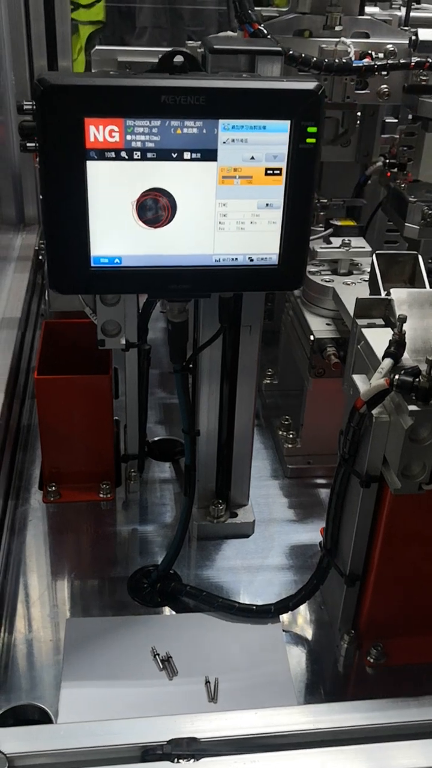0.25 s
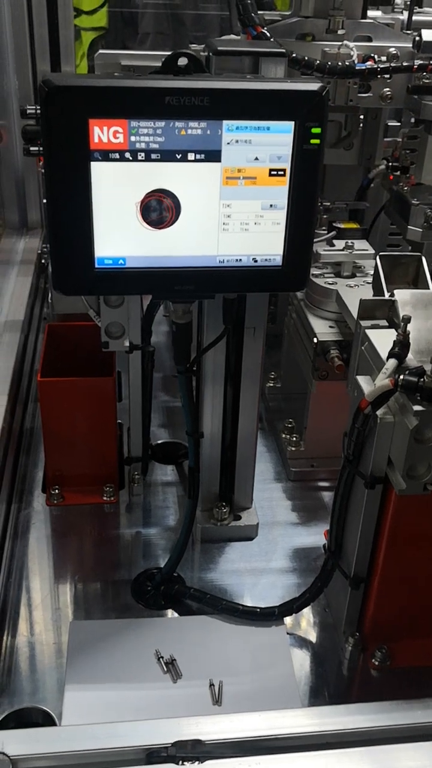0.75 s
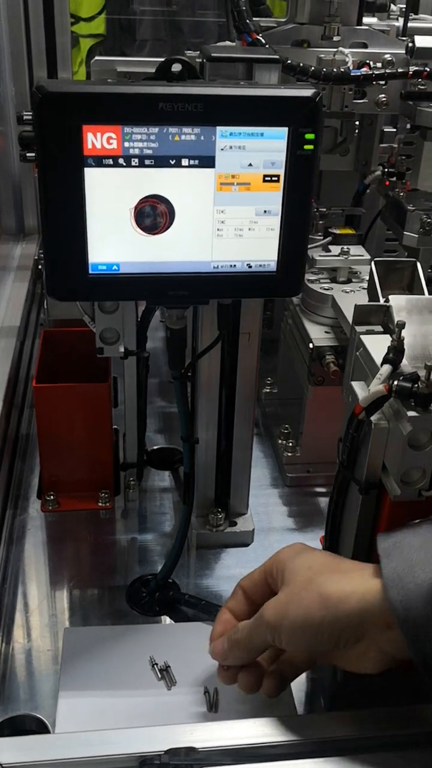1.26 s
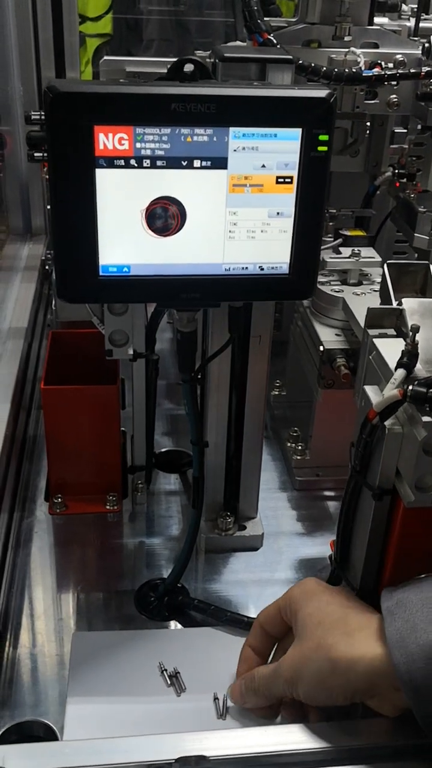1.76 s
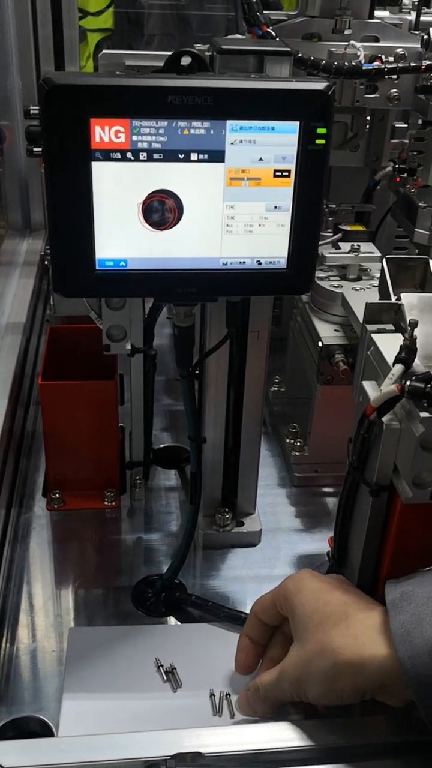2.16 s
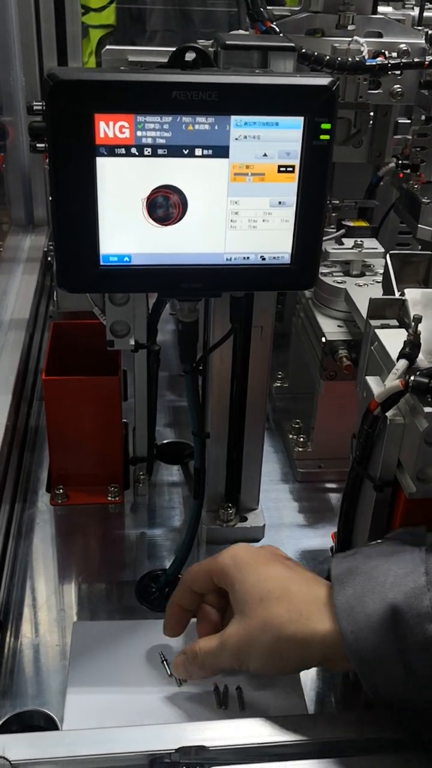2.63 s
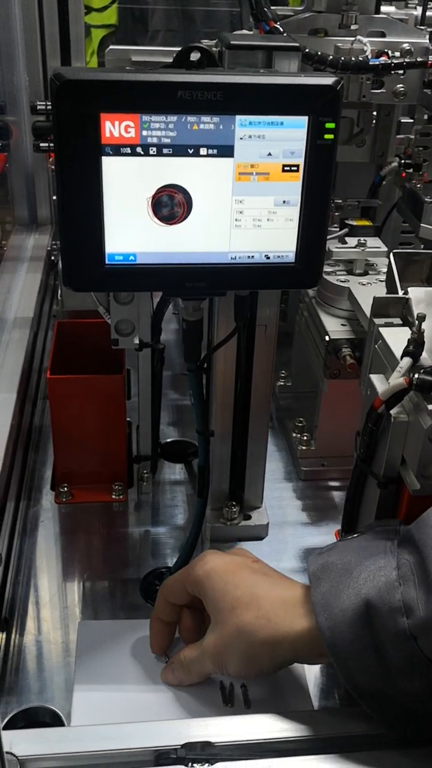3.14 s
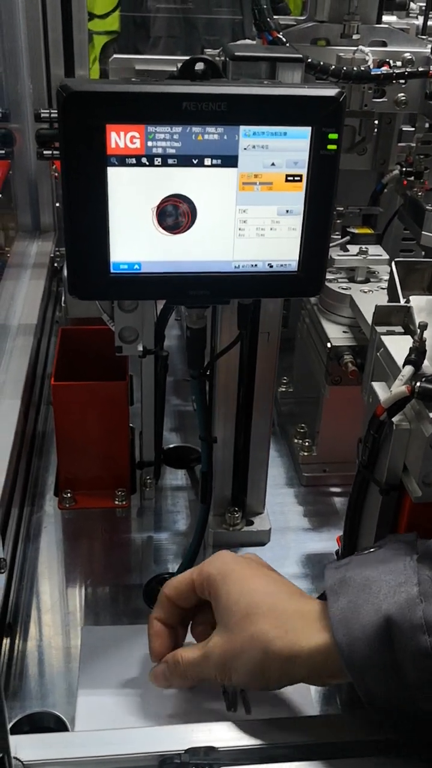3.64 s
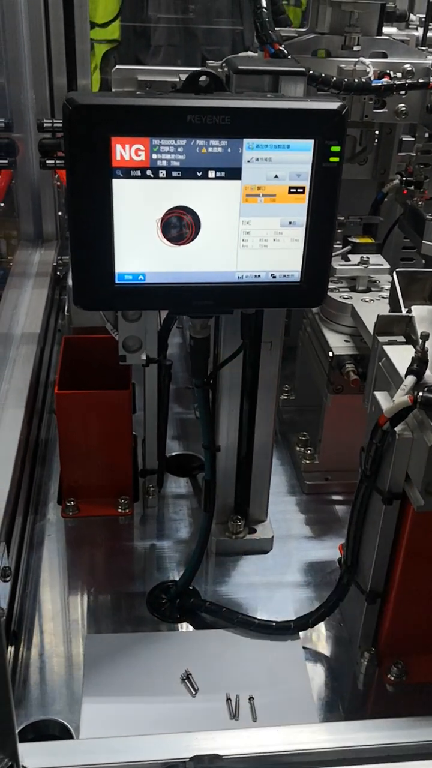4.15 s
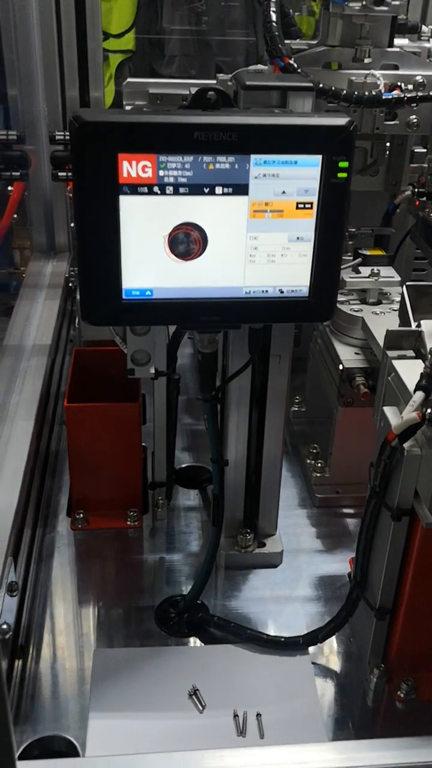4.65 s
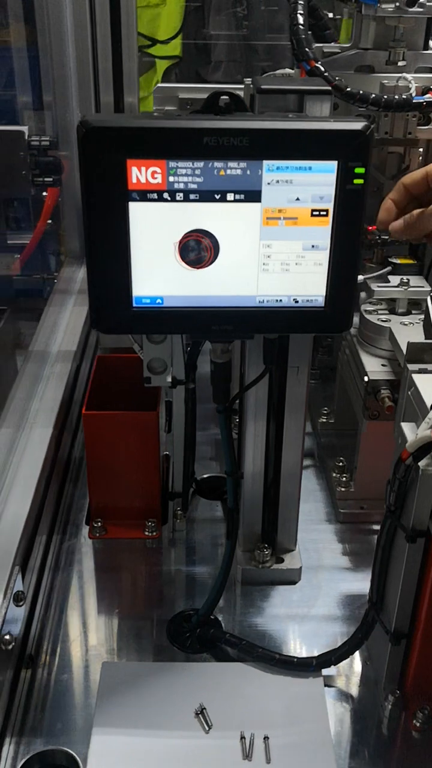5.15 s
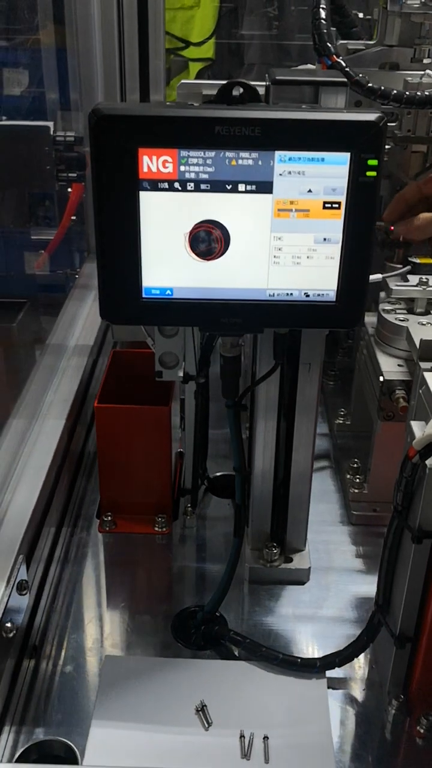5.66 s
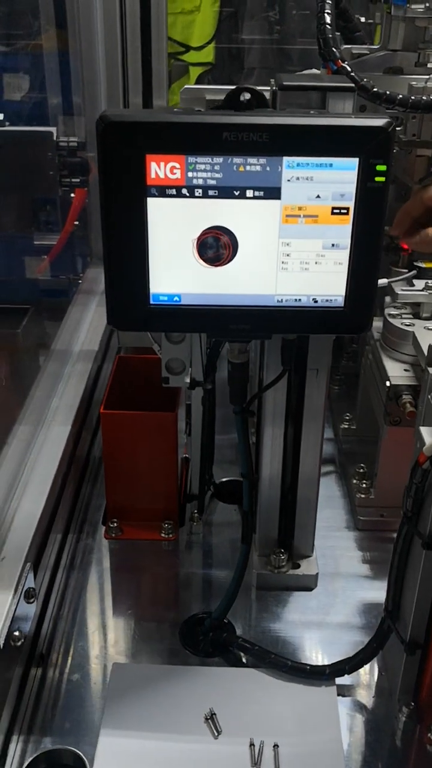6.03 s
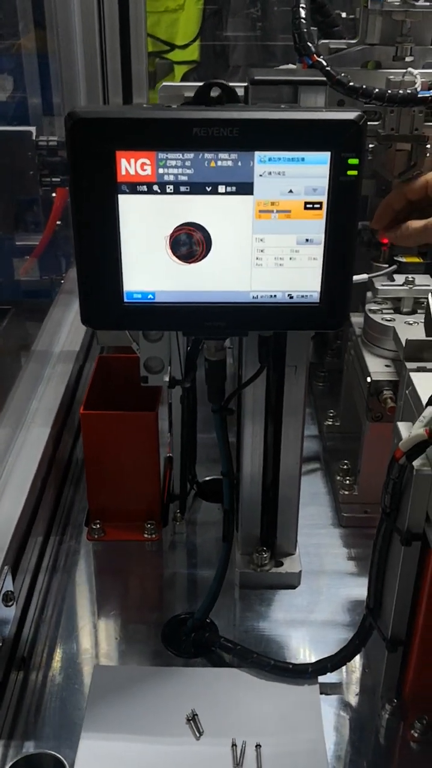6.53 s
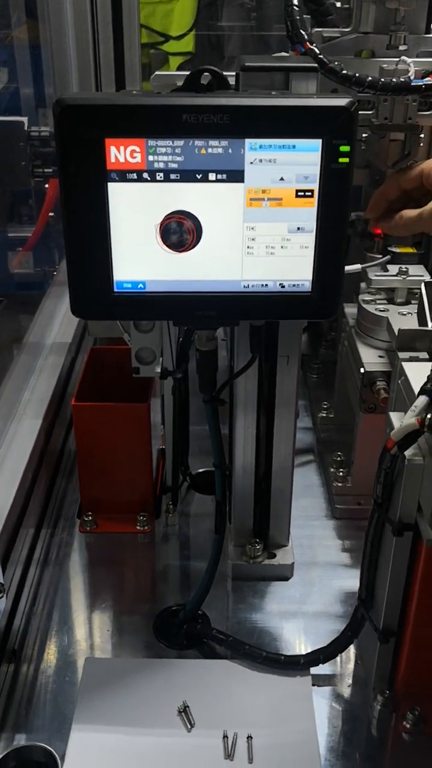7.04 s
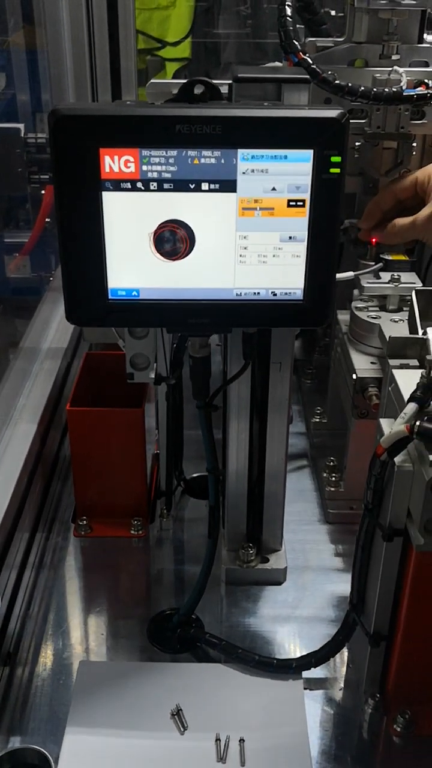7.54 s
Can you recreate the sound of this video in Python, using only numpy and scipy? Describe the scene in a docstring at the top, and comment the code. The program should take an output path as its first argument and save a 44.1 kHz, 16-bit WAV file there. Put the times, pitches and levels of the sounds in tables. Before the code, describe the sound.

Bursts of whistling compressed air, valve puffs and metal clanks sound over the steady hum of factory machinery.

```python
"""Humming motors and the steady hiss of a leaking air line: an assembly machine in a hard-walled hall.
Valves puff, pneumatic cylinders clunk against their stops and a servo whines faintly upward.
Then an air jet takes over, blowing in bursts across metal parts while a carriage rumbles on its rail.
Late on, the steel frame clanks and rings. The left microphone port resonates in the treble and makes
all the hiss whistle; the recorder's gain control ducks the hum under each burst."""
import sys
import numpy as np
from scipy import signal
from scipy.fft import rfft, irfft, next_fast_len
from scipy.io import wavfile
from scipy.ndimage import uniform_filter1d, map_coordinates

SR = 44100
rng = np.random.default_rng(int(sys.argv[2]) if len(sys.argv) > 2 else 0)


def to_wav(sig):
    """Store sig (one row per channel, or 1-D mono) as 16-bit WAV at the path in sys.argv[1].

    Samples outside -1..1 are clipped; the rate is SR.
    """
    pcm = np.clip(np.atleast_2d(sig), -1, 1) * 32767
    pcm = np.round(pcm).astype(np.int16)
    wavfile.write(sys.argv[1], SR, pcm.T)  # frames by channels


N = 343521

# bursts of the air jet: open_s, close_s, rise_s, hiss_db, fizz_db, splash_db, roar_db, bin_db
JET_BURSTS = [(2.285, 2.436, 0.088, -31, -37, -32, -42, -42),
              (2.363, 2.74, 0.43, -23.3, -29, -27.5, -44, -58),
              (2.647, 2.88, 0.19, -20.5, -25.5, -24, -32, -43),
              (3.27, 3.56, 0.28, -18.5, -21.5, -24, -29.5, -34.5),
              (3.58, 3.796, 0.11, -20.5, -25.5, -22.5, -26.5, -33),
              (3.924, 4.232, 0.27, -20, -22.5, -23.5, -29.5, -34.5),
              (4.303, 4.935, 0.26, -19.5, -23.5, -16.5, -28.5, -62),
              (5.281, 5.707, 0.18, -19.5, -24.5, -19.5, -25.5, -43),
              (5.881, 6.085, 0.15, -20, -23, -21, -24, -33.5),
              (6.125, 6.66, 0.096, -20.5, -26.5, -22, -28, -34),
              (6.655, 6.993, .04, -21, -27.5, -18, -24.5, -34),
              (6.97, 7.715, 0.11, -19.5, -26, -18.5, -26.5, -39.5)]
# noise colours of the jet's layers: frequency_hz, density_db
HISS_COLOUR = [(1000, -28), (3000, -14.5), (5000, -3), (6300, -0.5), (7400, 1), (8400, -3), (9400, 1.5),
               (11000, -12.5), (15000, -33)]  # at the nozzle
FIZZ_COLOUR = [(2500, -19), (5000, -22), (8000, 4), (9400, 4), (11000, 3), (13000, -0.5), (15000, -6)]  # at sharp edges
SPLASH_COLOUR = [(1000, -21.5), (1400, -11), (1650, -4), (2100, 0), (2700, 0), (3100, -3), (4600, -5),
                 (7000, -7), (12000, -48)]  # on the parts
ROAR_COLOUR = [(400, -10), (600, -10), (760, -4), (860, 2), (1000, -0.5), (1170, 1), (1400, -2.5),
               (1700, 6), (2500, -16.5)]  # in the hollows
BIN_COLOUR = [(380, -15), (490, -2), (545, -6.5), (605, 2.5), (670, -1), (730, -5), (900, -35.5)]  # the hum of an open bin
# how each layer follows the jet's valve: lag_s, fall_db_per_s, trickle_db
HISS_FLOW = (0.0034, 100, -40)
FIZZ_FLOW = (0.0085, 135, -48.5)
SPLASH_FLOW = (0.022, 73, -41.5)
ROAR_FLOW = (0.02, 102, -61)
BIN_FLOW = (0.026, 117, -65)
# the jet whistles on an edge: time_s, pitch_hz, level_db
EDGE_WHISTLE = [(4.48, 2420, -58), (4.56, 2480, -40), (4.68, 2500, -47), (4.76, 2680, -37),
                (4.84, 2790, -35), (4.9, 2830, -56)]

# puffs of trapped air: start_s, level_db, t60_s
EXHAUST_PUFFS = [(.42, -39, 0.82), (.865, -36, .25), (2.17, -40.5, 0.43), (6.687, -16, 0.65),
                 (6.79, -12.5, 0.52), (7.09, -28, 0.22), (7.26, -22, 0.3), (7.42, -16, 0.27)]  # valves vent
NOZZLE_SPITS = [(2.315, -38, 0.44), (3.35, -19.5, 0.45), (5.35, -16, 0.49), (5.932, -27, 0.46),
                (6.17, -27, 0.55)]  # the jet's valve snaps open
# their noise colours: frequency_hz, density_db
EXHAUST_COLOUR = [(400, -19), (1500, -2), (2800, 3.5), (5500, -1), (8000, -10), (14000, -19)]
SPIT_COLOUR = [(2000, -32), (5000, -15), (6400, -7), (7400, 1), (8500, -9), (11000, -20), (15000, -34)]

# metal hits: start_s, level_db, brightness_hz
FRAME_BLOWS = [(6.288, -15.5, 2000), (6.305, -13, 4000), (6.318, -18, 4000), (6.38, -18, 3500),
               (6.52, -12.5, 1390), (6.532, -15, 1440)]
CYLINDER_STOPS = [(.893, -24, 4500), (.935, -24, 3800), (1.07, -22, 4800), (1.081, -21.5, 6500),
                  (1.106, -22, 8980), (1.122, -22.5, 13000), (1.28, -45, 3500)]
# contact noise of the frame's clank and the cylinders' clunk: frequency_hz, density_db
CLANK_COLOUR = [(400, -26), (800, -4.5), (1300, -2.5), (2100, 0.5), (2750, 0), (3200, -6), (6000, -25)]
CLUNK_COLOUR = [(120, -27), (200, -9), (360, -11.5), (540, 0.5), (700, -2), (900, -2.5), (1200, -3),
                (1900, -5.5), (2350, 1.5), (3100, -3.5), (4000, -8.5), (6000, -16.5), (9000, -26.5),
                (14000, -38)]
# resonances of the steel frame and the cylinder mounts: pitch_hz, width_hz, gain_db
FRAME_MODES = [(837, 12, 11), (1277, 36, 6.6), (1484, 43, 5), (1920, 26, 7), (2047, 35, 7.4),
               (2210, 38, 4.4), (2700, 28, 6.7)]
MOUNT_MODES = [(518, 16, -1), (618, 42, 3), (869, 20, 5.5), (974, 40, 0), (1060, 25, 3.5), (1460, 26, 1),
               (1650, 30, 0), (1834, 55, 4), (2300, 100, -3), (2520, 34, -1)]

# the carriage travels on its rail: start_s, stop_s, level_db
CARRIAGE_MOVES = [(3.37, 3.598, -23), (3.61, 3.876, -27.5), (4.06, 4.3, -29.5), (4.526, 4.617, -32.5),
                  (6.008, 6.13, -30), (6.207, 7.698, -39)]
# rumble of its bearings: frequency_hz, density_db
BEARING_COLOUR = [(110, -21), (200, -3), (310, 0.5), (350, -4.5), (390, 3), (450, -18.5), (600, -18),
                  (1000, -25)]
# its servo speeds up: time_s, pitch_hz, level_db
SERVO_WHINE = [(1.67, 4000, -63), (1.71, 4010, -51), (1.75, 4020, -62), (1.8, 4020, -55), (1.83, 4440, -53),
               (1.87, 4500, -59), (1.93, 4750, -55), (2.0, 4750, -72)]
# sheet panels boom: peak_s, level_db, pitch_hz, swell_s
PANEL_BOOMS = [(.6, -41, 301, 0.1), (1.0, -29, 197, 0.053), (4.11, -30, 152, .04)]

# the leak, dipping after the cylinders' stroke: time_s, level_db
LEAK_LEVEL = [(0, -42), (.9, -39.5), (1.15, -36), (1.3, -45), (1.41, -39), (2.1, -42), (7.79, -42.5)]
# noise beds of the leak and the hall: frequency_hz, density_db
LEAK_COLOUR = [(300, 7.5), (600, 4), (1000, 2.5), (1400, 2), (1900, 4.5), (2550, 4.5), (3200, -2),
               (7500, -7), (8400, -8), (9300, -4), (11000, -13.5), (15000, -18)]
RUMBLE_COLOUR = [(25, -24), (36, -36), (48, 4), (72, -1.5), (110, 4), (128, -11), (160, -5.5), (185, 1),
                 (215, -2.5), (245, -6.5), (300, -6), (420, -16.5), (700, -22.5), (1500, -67)]
# motor and feeder tones: pitch_hz, level_db
MOTOR_TONES = [(86.4, -36.5), (110.3, -39.5), (222, -40.5), (301, -53.5), (388, -64)]

# the hall's reverb time: frequency_hz, t60_s
HALL_DECAY = [(200, 0.93), (1000, 0.67), (2500, 0.89), (5000, 0.63), (10000, 0.6)]
# how alike the hall makes left and right: frequency_hz, correlation
STEREO_LIKENESS = [(60, 0.96), (130, 0.96), (290, 0.86), (400, -0.071), (520, -0.57), (700, -0.58),
                   (880, 0.19), (1500, 0.063), (2200, -0.051), (4000, 0.013)]
# cavity resonance of the left microphone port: frequency_hz, gain_db
LEFT_PORT_EQ = [(400, 0), (1500, 1.5), (3200, 2.5), (5000, 4.5), (5800, 8.5), (6200, 4.5), (6900, 12),
                (7450, 17.5), (7950, 10.5), (8600, 0.5), (10500, -5.5), (14000, 0.5)]

SURGE_DB, SURGES_PER_S = 0.55, 22  # unsteady supply pressure
SEEP_DB, SEEP_FADES_AT_S, SEEP_FALL_DB_PER_S = -54, 0.81, 180  # a thin hiss that fades early
HUM_FADE_DB_PER_S = 0.09
DUCK_THRESHOLD_DB, DUCK_DB_PER_DB, DUCK_REACTION_S = -29, 0.34, 0.042
PEAK_CEILING, TOP_HZ = 0.86, 15350


def air_jet():
    """Air hisses at the nozzle, fizzes at edges, splashes on parts and roars in hollows."""
    hiss_db, fizz_db, splash_db, roar_db, bin_db = np.transpose(JET_BURSTS)[3:]
    flutter_db = 0.53 * wobble(35) + 0.48 * wobble(400)  # turbulence
    surge = amp(SURGE_DB * wobble(SURGES_PER_S))
    hiss = jet_flow(hiss_db, *HISS_FLOW) * surge * noise(HISS_COLOUR)
    fizz = jet_flow(fizz_db, *FIZZ_FLOW) * noise(FIZZ_COLOUR)
    splash = jet_flow(splash_db, *SPLASH_FLOW) * noise(SPLASH_COLOUR)
    roar = jet_flow(roar_db, *ROAR_FLOW) * noise(ROAR_COLOUR)
    bin_hum = jet_flow(bin_db, *BIN_FLOW) * noise(BIN_COLOUR)
    inside = panel_echoes(splash + roar + bin_hum, echo_db=-18, longest_s=0.025)
    air = amp(flutter_db) * turbulence(hiss + fizz + inside, depth_db=1.66)
    return air + whistle(EDGE_WHISTLE, flicker_db=7.5, spread_hz=86)


def jet_flow(levels_db, lag_s, fall_db_per_s, trickle_db):
    """Envelope of one jet layer: bursts rise, hold and fall; once opened, the valve keeps trickling."""
    first_open_s, _, first_rise_s, *_ = JET_BURSTS[0]
    gain = amp(trickle_db) * gate(first_open_s + lag_s, N / SR, first_rise_s, fall_db_per_s)
    for (open_s, close_s, rise_s, *_), db in zip(JET_BURSTS, levels_db):
        burst = amp(db) * gate(open_s + lag_s, close_s + lag_s, rise_s, fall_db_per_s)
        gain = np.maximum(gain, burst)
    return gain


def valves():
    """Exhaust ports puff broadly; the jet's nozzle spits sharply."""
    return puffs(EXHAUST_PUFFS, EXHAUST_COLOUR) + puffs(NOZZLE_SPITS, SPIT_COLOUR)


def puffs(rows, colour):
    """Trapped air leaves in puffs that fade as the pressure drops."""
    track, t = np.zeros((2, N)), np.arange(SR) / SR
    attack = 1 - np.exp(-t / 0.0077)
    for start_s, db, t60_s in rows:
        add(track, start_s, amp(db - 60 * t / t60_s) * attack * noise(colour, size=SR))
    return track


def frame_clanks():
    """Each blow rings the steel frame."""
    track = np.zeros((2, N))
    for start_s, db, brightness_hz in FRAME_BLOWS:
        clank = strike(CLANK_COLOUR, brightness_hz, direct_t60_s=0.16, hall_db=-5)
        add(track, start_s, amp(db) * clank)
    return resonate(track, FRAME_MODES)


def cylinder_clunks():
    """Pistons clunk on their stops and ring the mounts."""
    track = np.zeros((2, N))
    for start_s, db, brightness_hz in CYLINDER_STOPS:
        clunk = strike(CLUNK_COLOUR, brightness_hz, direct_t60_s=0.022, hall_db=-3.5)
        add(track, start_s, amp(db + 3.5) * clunk)
    return resonate(track, MOUNT_MODES)


def strike(colour, brightness_hz, direct_t60_s, hall_db):
    """A snap of contact noise with the hall's tail behind it; a softer contact holds less treble."""
    t = np.arange(SR) / SR
    hz, age_s, bands = signal.stft(noise(colour, size=SR), SR, nperseg=256)
    decay = amp(-60 * age_s / along(HALL_DECAY, hz)[:, None])
    tail = signal.istft(bands * decay, SR, nperseg=256)[1][:, :SR]
    build_up = 1 - np.exp(-t / 0.0037)
    direct = amp(-60 * t / direct_t60_s) * noise(colour, size=SR)
    lowpass = signal.butter(2, brightness_hz, fs=SR, output="sos")
    return signal.sosfilt(lowpass, direct + amp(hall_db) * build_up * tail)


def carriage():
    """A servo whines upward in fits; later, bearings rumble as the carriage travels."""
    travel = sum(amp(db) * gate(start_s, stop_s, rise_s=0.086, fall_db_per_s=106)
                 for start_s, stop_s, db in CARRIAGE_MOVES)
    return travel * noise(BEARING_COLOUR) + whistle(SERVO_WHINE, flicker_db=3, spread_hz=90)


def panel_booms():
    """Moving parts briefly shake sheet panels at their low resonances."""
    track, t = np.zeros(N), np.arange(N) / SR
    for peak_s, db, hz, swell_s in PANEL_BOOMS:
        swell = np.exp(-0.5 * ((t - peak_s) / swell_s) ** 2)
        track += amp(db) * swell * tone(hz * (1 + 0.0266 * wobble(39.6)))
    return track


def air_leak():
    """Air escapes steadily from a fitting, at first with a thin hiss on top."""
    leak_db, = curves(LEAK_LEVEL)
    leak = amp(leak_db + 0.37 * wobble(12)) * turbulence(noise(LEAK_COLOUR), depth_db=1.33)
    seep_db = SEEP_DB - SEEP_FALL_DB_PER_S * np.clip(np.arange(N) / SR - SEEP_FADES_AT_S, 0, 1)
    return leak + amp(seep_db) * noise(HISS_COLOUR)


def motors():
    """Slightly unsteady tones over the rumble of the hall; the whole bed sinks slowly."""
    hum = sum(amp(db + 1.17 * wobble(4.08)) * tone(hz * (1 + 0.00386 * wobble(3.104)))
              for hz, db in MOTOR_TONES)
    fade = amp(-HUM_FADE_DB_PER_S * np.arange(N) / SR)
    return fade * (hum + amp(-35.5) * noise(RUMBLE_COLOUR))


def whistle(rows, flicker_db, spread_hz):
    """A rough gliding tone that reaches each microphone port by its own paths."""
    hz, db = curves(rows)
    t = np.arange(N) / SR
    sounding = (t >= rows[0][0]) & (t <= rows[-1][0])
    ports = [amp(flicker_db * wobble(45) + 2) * tone(hz + spread_hz * wobble(400)) for _ in range(2)]
    return sounding * amp(db) * np.array(ports)


def turbulence(x, depth_db, width_bins=5, length_frames=22):
    """Shifting turbulence makes patches of the spectrum swell and fade."""
    bands = signal.stft(x, nperseg=512)[2]
    patches = uniform_filter1d(rng.standard_normal(bands.shape[1:]), width_bins, axis=0)
    patches = uniform_filter1d(patches, length_frames, axis=1)
    return signal.istft(bands * amp(depth_db * unit(patches)), nperseg=512)[1][:, :N]


def panel_echoes(x, echo_db, longest_s, count=14):
    """Close metal panels send back early reflections, which ripple the spectrum."""
    impulse = np.zeros((2, SR // 8))
    for channel in impulse:
        delays = (longest_s * SR * rng.uniform(0.0803, 1, count)).astype(int)
        channel[delays] = amp(echo_db) * rng.choice([-1, 1], count)
        channel[0] = 1
    return signal.fftconvolve(x, impulse / np.linalg.norm(impulse[0]), axes=1)[:, :N]


def resonate(x, modes):
    """A body lifts the sound at its resonances and lets it ring briefly."""
    peak = lambda f, hz, width: 1j * f * width / (hz * hz - f * f + 1j * f * width)
    return filtered(x, lambda f: 1 + sum(amp(db) * peak(f, hz, width) for hz, width, db in modes))


def noise(colour, size=N):
    """Coloured noise of rms 1 with the stereo width of the hall."""
    angle = lambda hz: np.arccos(along(STEREO_LIKENESS, hz)) / 2
    response = lambda hz: amp(along(colour, hz)) * [np.cos(angle(hz)), np.sin(angle(hz))]
    mid, side = filtered(rng.standard_normal((2, size)), response)
    return unit(np.array([mid + side, mid - side]))


def tone(hz):
    """A sine of rms 1 that follows a pitch curve."""
    return np.sqrt(2) * np.sin(2 * np.pi * (np.cumsum(hz) / SR + rng.random()))


def gate(start_s, stop_s, rise_s, fall_db_per_s):
    """An envelope that rises smoothly, holds, and dies away after the stop."""
    t = np.arange(N) / SR
    attack = np.sin(np.pi / 2 * np.clip((t - start_s) / rise_s, 0, 1))
    return attack * amp(-fall_db_per_s * np.clip(t - stop_s, 0, 1))


def wobble(knots_per_s):
    """Smooth random modulation."""
    knots = rng.standard_normal(int(N * knots_per_s / SR) + 4)
    steps = np.arange(0, len(knots) - 1, 1 / 10)
    return np.interp(np.arange(N) * knots_per_s / SR, steps, map_coordinates(knots, [steps]))


def curves(rows):
    """An automation curve for each column after the time."""
    times_s, *columns = np.transpose(rows)
    return [np.interp(np.arange(N) / SR, times_s, column) for column in columns]


def along(points, hz):
    """Read (frequency_hz, value) points on a log axis."""
    points_hz, values = np.transpose(points)
    return np.interp(np.log(hz + 1), np.log(points_hz + 1), values)


def filtered(x, response):
    """Equalise x with a gain given as a function of frequency."""
    size = x.shape[-1]
    padded = next_fast_len(size + SR // 4)
    return irfft(rfft(x, padded) * response(np.fft.rfftfreq(padded, 1 / SR)), padded)[..., :size]


def add(track, start_s, sound):
    """Mix a stereo sound into the track."""
    part = track[:, round(start_s * SR):][:, :sound.shape[-1]]
    part += sound[:, :part.shape[-1]]


def amp(db):
    """Decibels to gain."""
    return 10 ** (np.asarray(db) / 20)


def unit(x):
    """Scale to rms 1."""
    return x / np.sqrt(np.mean(x ** 2) + 1e-20)


def gain_control(x):
    """The recorder turns itself down as the sound gets loud, so the hum ducks under each burst."""
    pole = np.exp(-1 / (DUCK_REACTION_S * SR))
    power = signal.lfilter([1 - pole], [1, -pole], np.mean(x ** 2, axis=0))
    over_db = np.maximum(10 * np.log10(power + 1e-20) - DUCK_THRESHOLD_DB, 0)
    return x * amp(-DUCK_DB_PER_DB * over_db)


def scene():
    """The jet and the moving parts over a bed of hum and leaking air."""
    bed = motors() + air_leak()
    return bed + air_jet() + carriage() + cylinder_clunks() + valves() + panel_booms() + frame_clanks()


def record(dry):
    """The left port rings, gain control ducks, peaks are rounded and the very top is cut off."""
    left = filtered(dry[0], lambda hz: amp(along(LEFT_PORT_EQ, hz)))
    ducked = gain_control(np.array([left, dry[1]]))
    rounded = ducked / (1 + np.abs(ducked / PEAK_CEILING) ** 6) ** (1 / 6)
    return filtered(rounded, lambda hz: hz < TOP_HZ)


dry = scene()
out = record(dry)
to_wav(out)
```